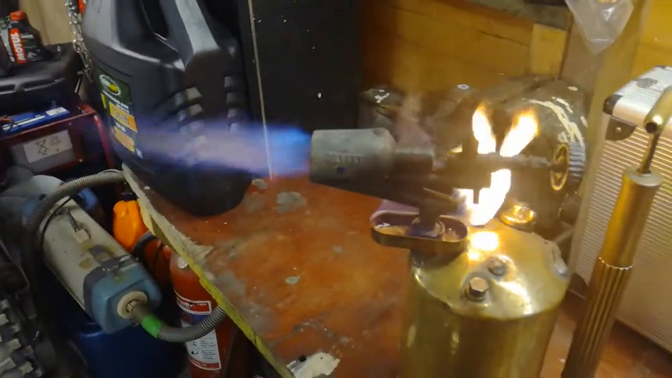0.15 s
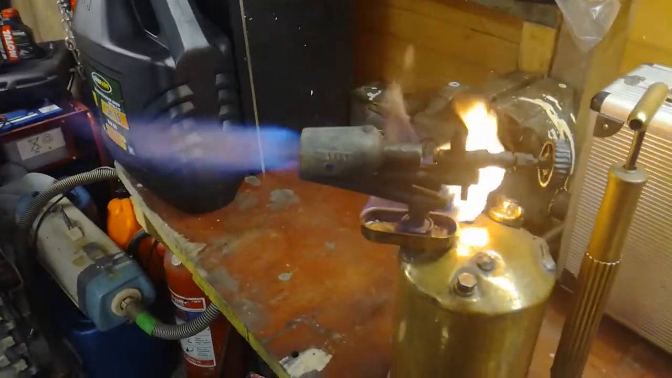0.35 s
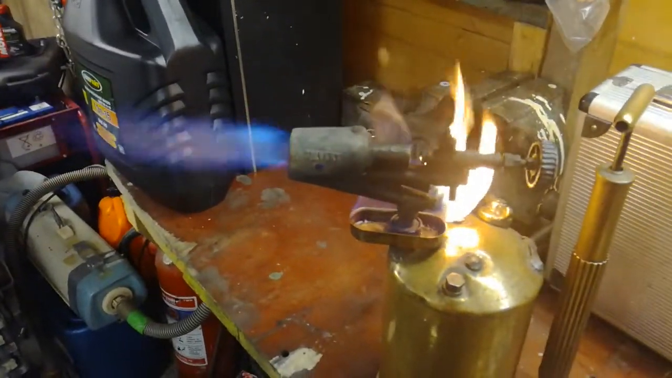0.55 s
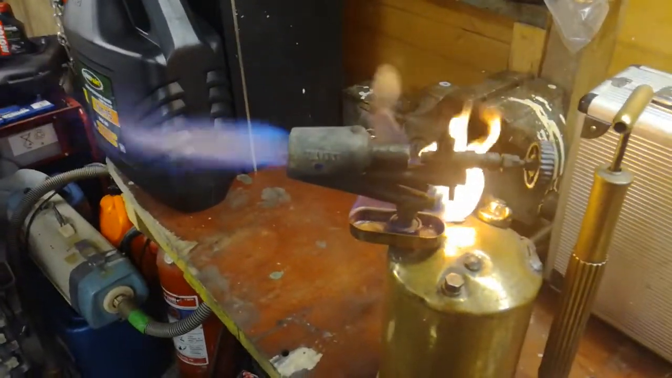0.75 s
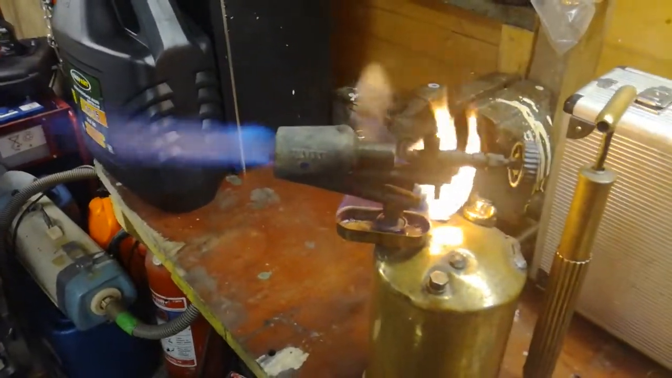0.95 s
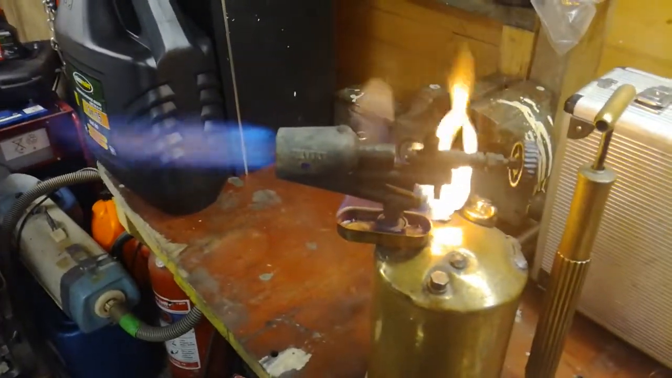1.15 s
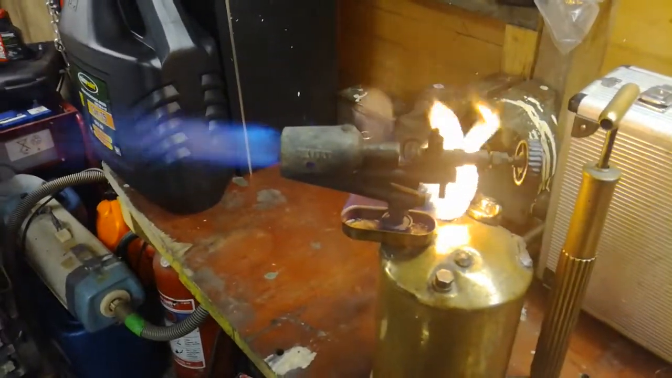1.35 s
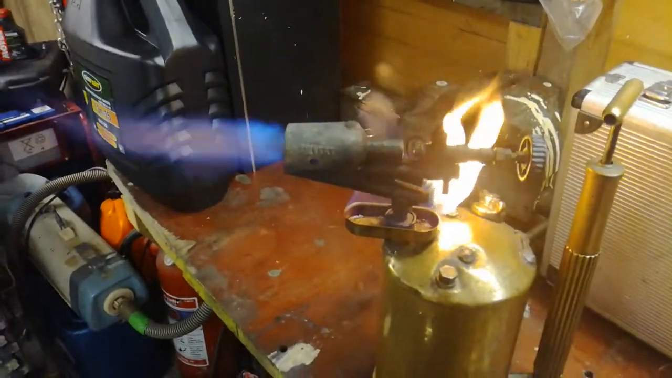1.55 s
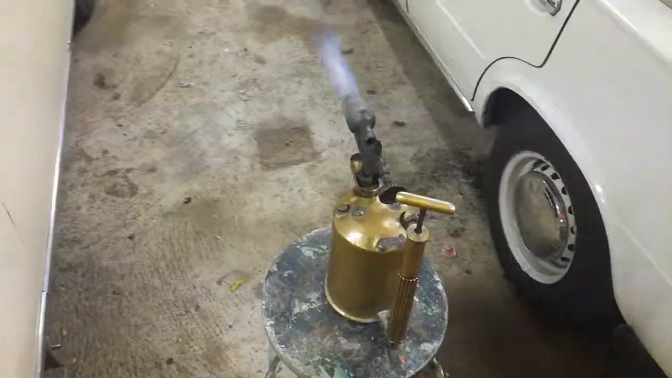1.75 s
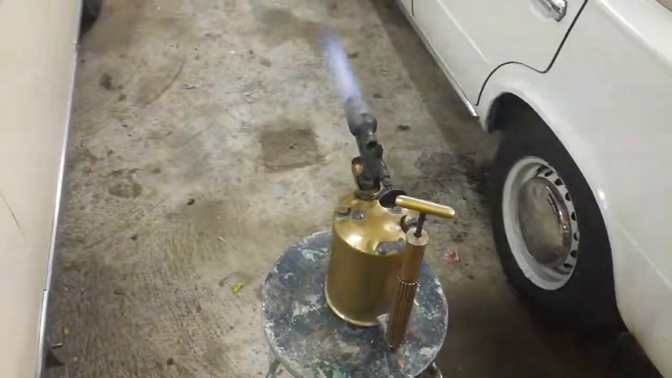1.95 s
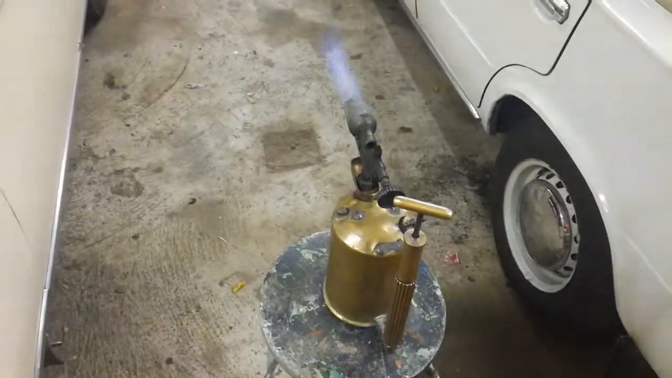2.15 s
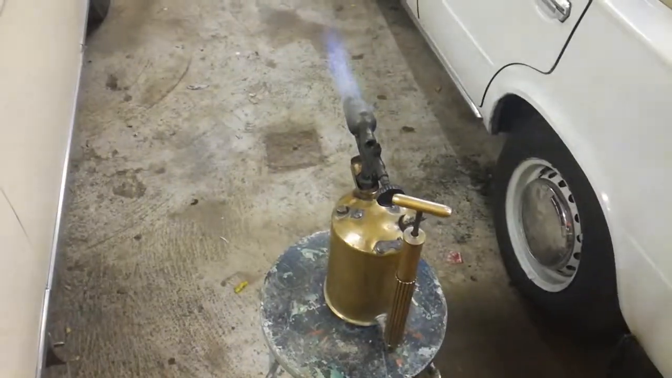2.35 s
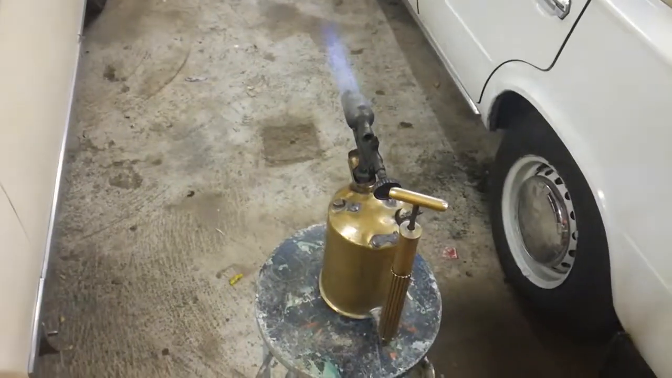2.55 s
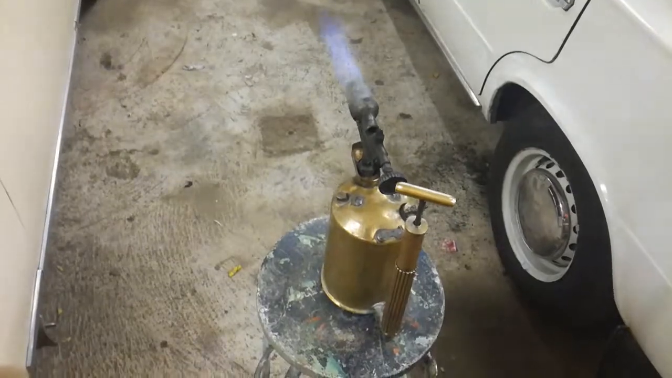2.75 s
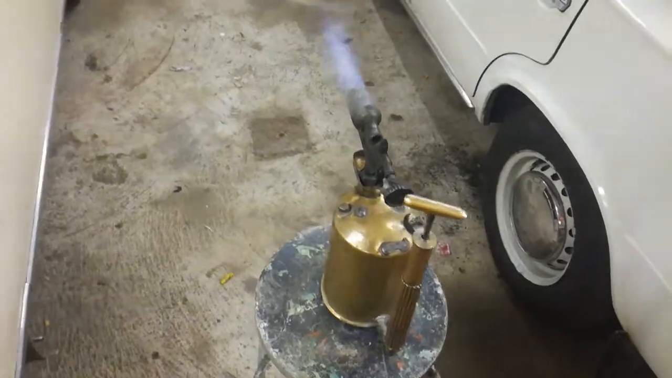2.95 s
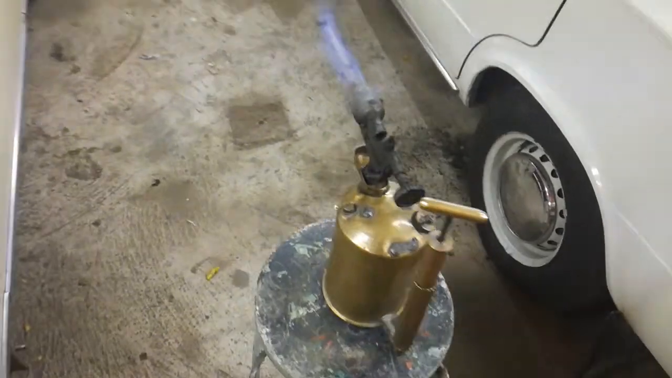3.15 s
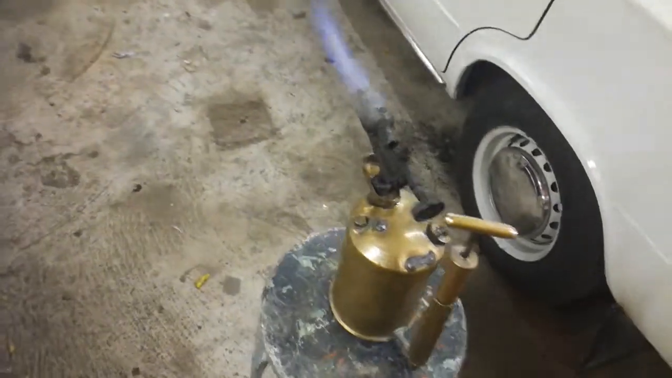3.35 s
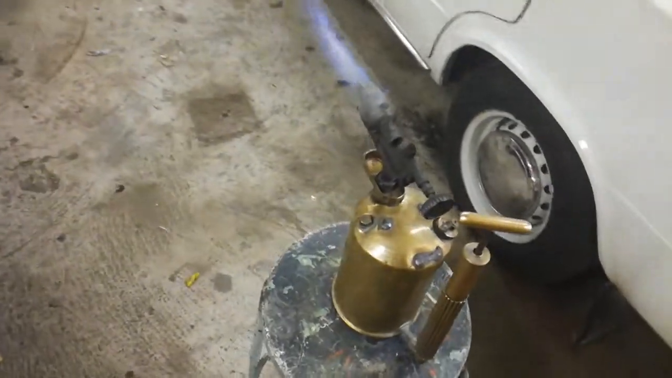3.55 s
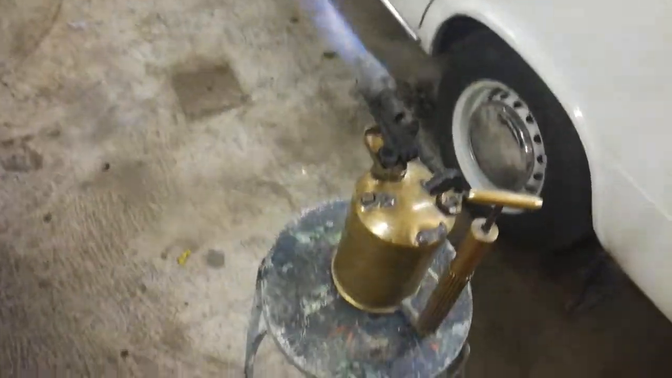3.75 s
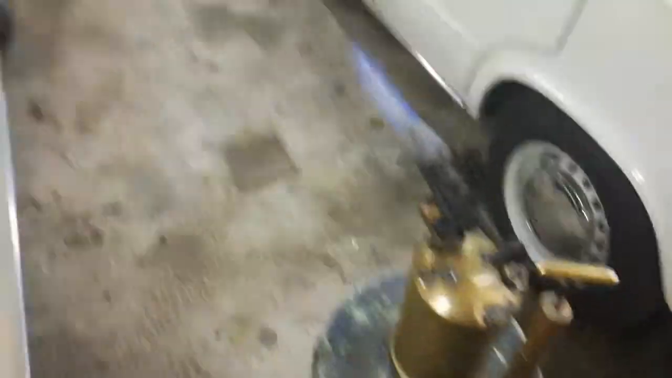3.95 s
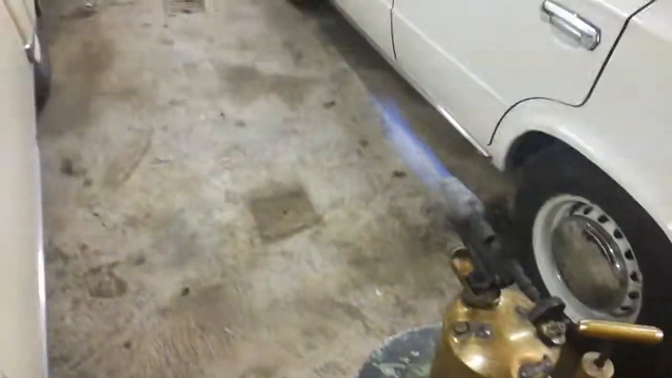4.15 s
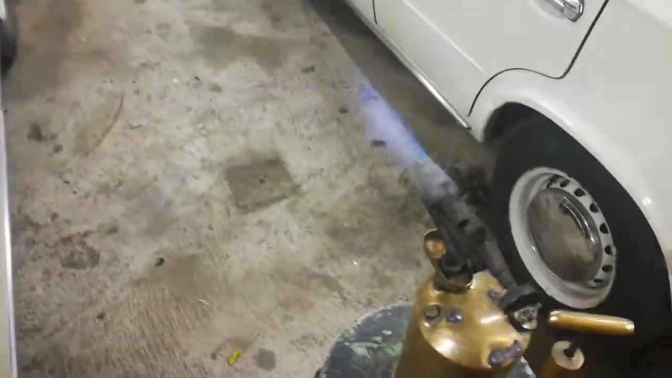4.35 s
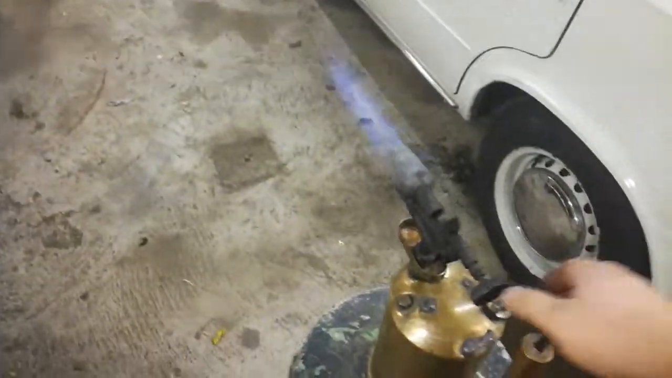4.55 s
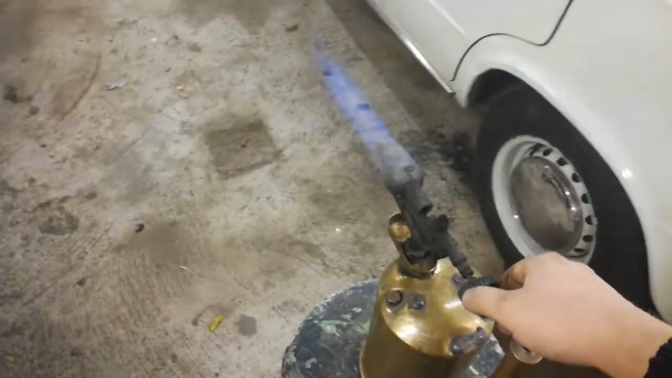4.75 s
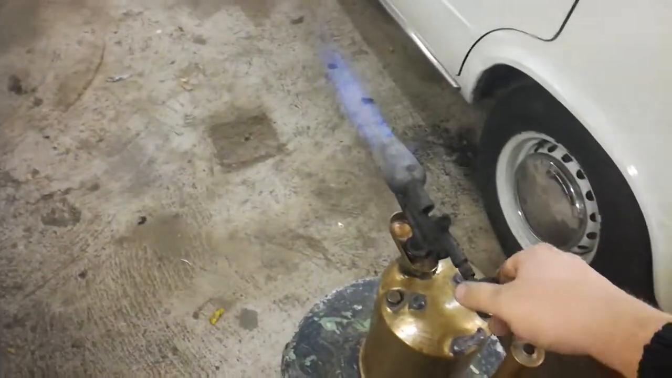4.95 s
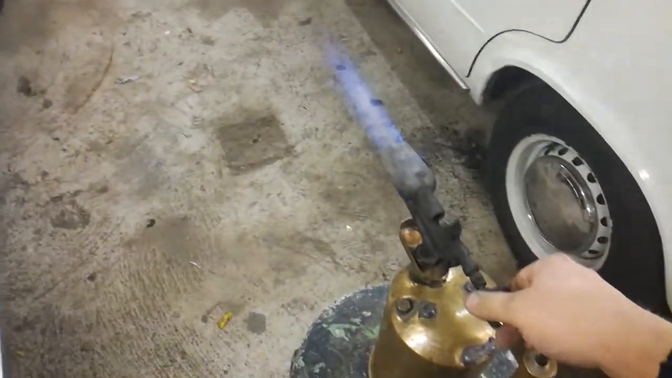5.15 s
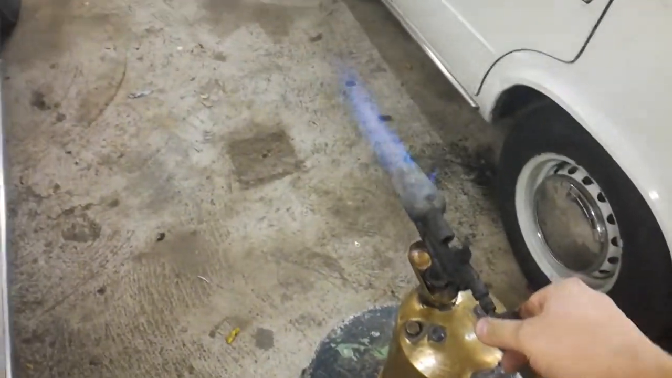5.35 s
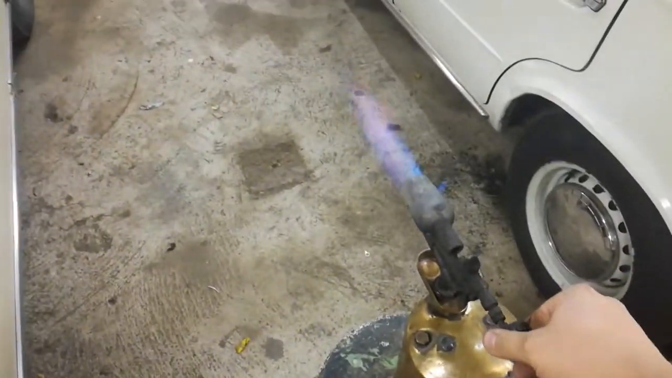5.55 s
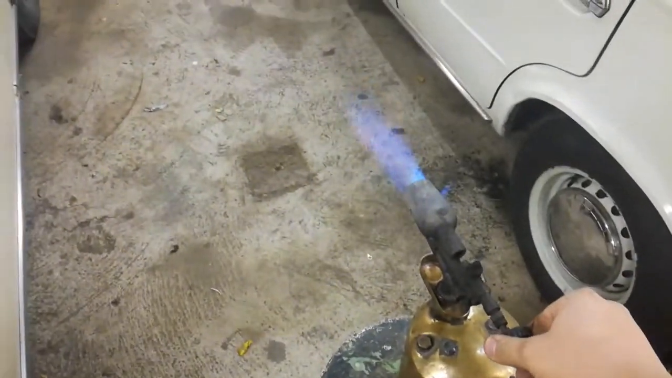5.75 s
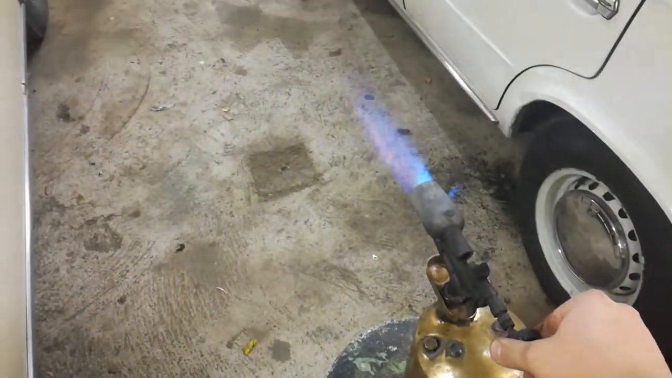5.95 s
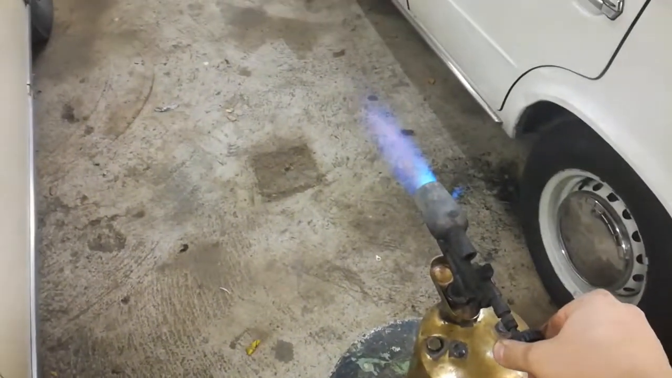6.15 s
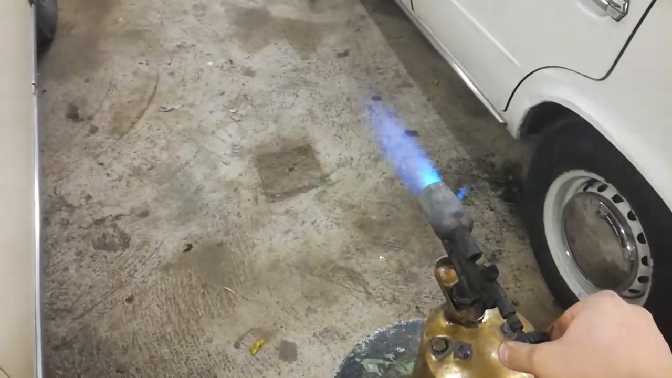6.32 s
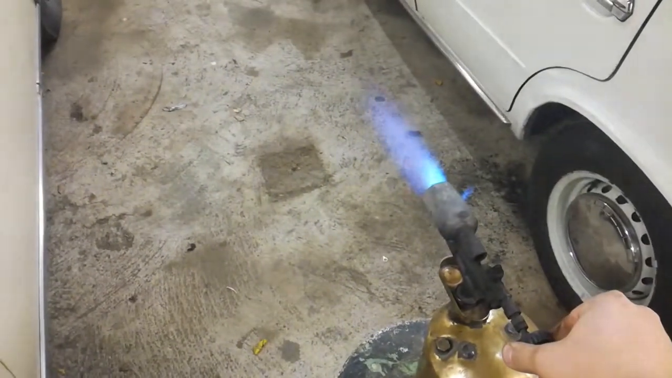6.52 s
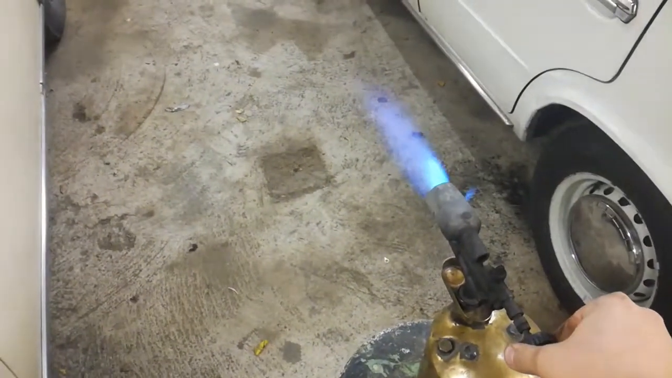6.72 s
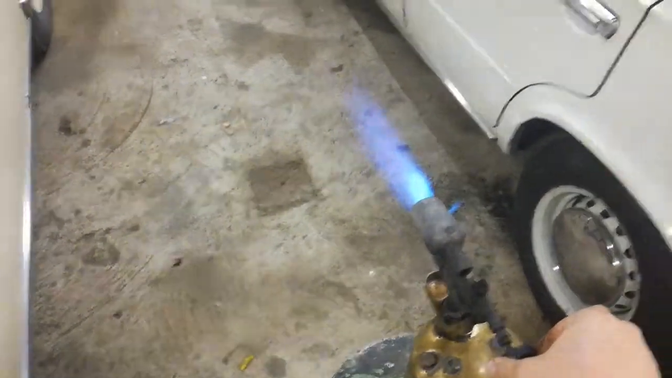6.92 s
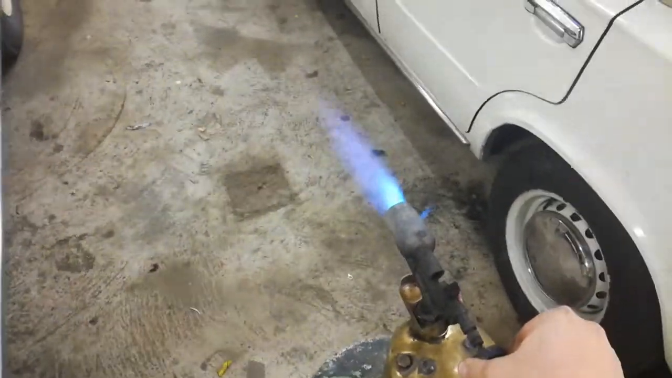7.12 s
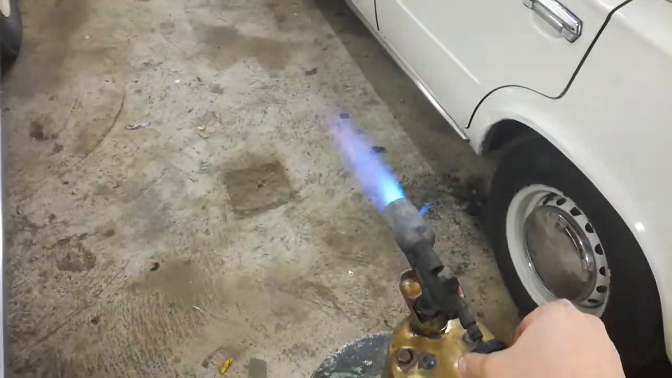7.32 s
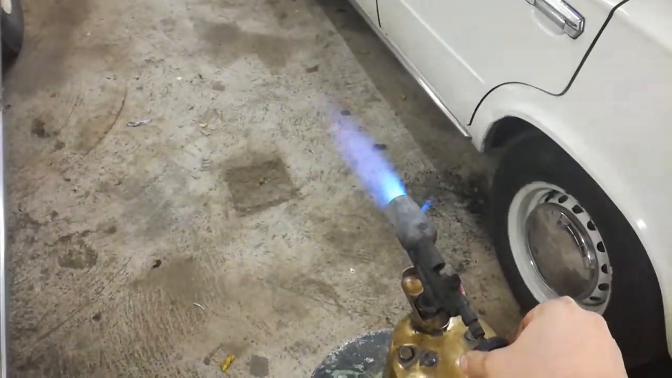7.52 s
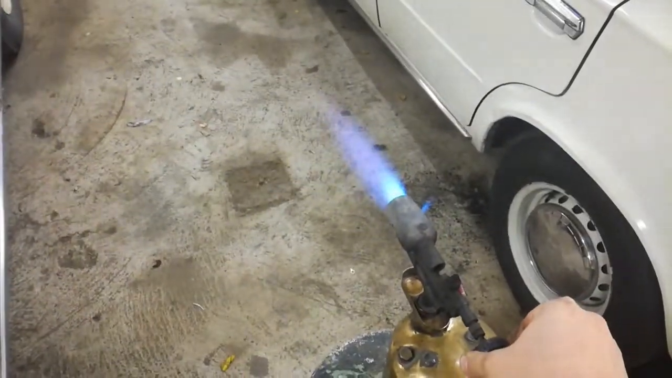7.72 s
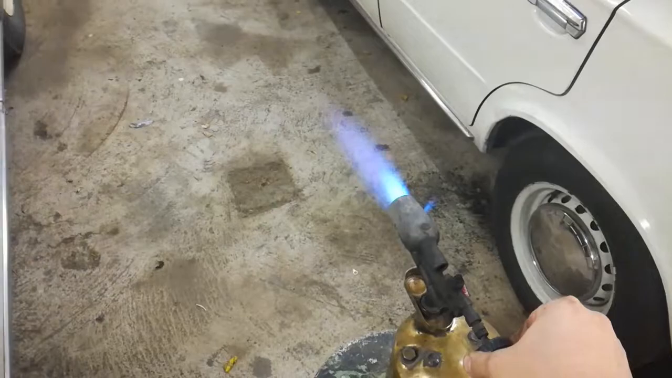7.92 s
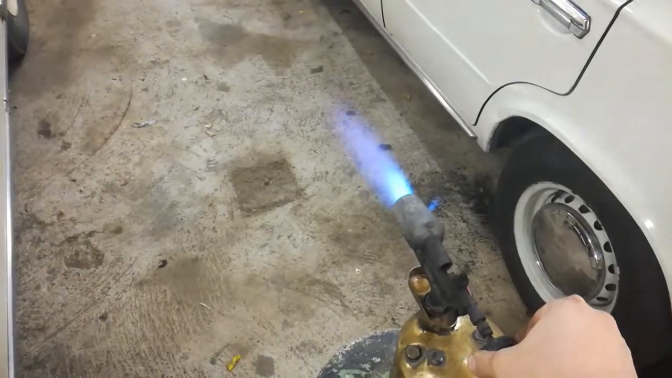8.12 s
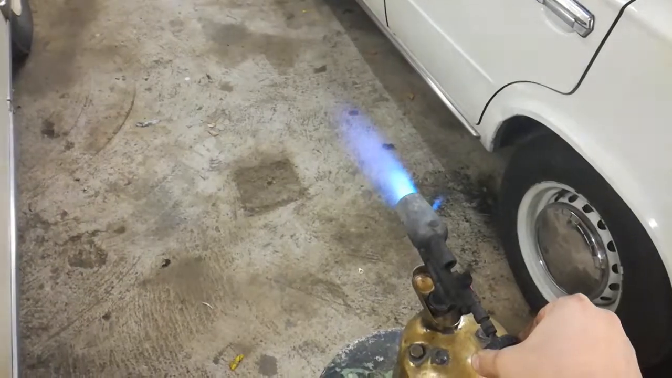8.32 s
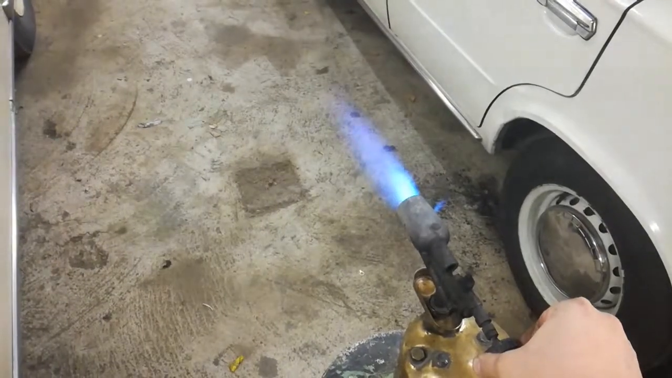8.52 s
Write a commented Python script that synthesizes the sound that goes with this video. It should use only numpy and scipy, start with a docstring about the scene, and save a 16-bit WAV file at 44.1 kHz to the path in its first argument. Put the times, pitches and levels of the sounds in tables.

```python
"""In a garage a pressurised gasoline blowtorch burns, first close up on a cluttered bench, its flame throbbing,
then, after a short gap, on a stool beside a car. The listener steps nearer and the valve is opened to a full roar.
Turbulent noise, shaped by resonances and echoes, is split into the roar of the flame, the rush of the burner tube
and the hiss of the vapour jet; narrow bands of noise add whistles, tube notes, humps of hiss and low booms."""
import sys
import numpy as np
from scipy import signal
from scipy.fft import rfft, irfft
from scipy.io import wavfile

SR = 44100
rng = np.random.default_rng(int(sys.argv[2]) if len(sys.argv) > 2 else 0)


def wrap_up_sound(samples):
    """Save the sound to the file named by the first command line argument, as 16-bit audio."""
    columns = np.atleast_2d(samples).T
    # keep every value between -1 and 1, then stretch to whole-number steps
    tamed = np.clip(columns, -1, 1)
    steps = np.round(tamed * 32767).astype(np.int16)
    wavfile.write(sys.argv[1], SR, steps)


N = 378378
BINS = np.arange(N // 2 + 1) * SR / N   # frequencies of the spectrum, Hz
ROAR_TOP_HZ, RUSH_TOP_HZ = 400, 4000    # borders between roar, rush and hiss

# when the torch on the bench is heard: time_s, gain (0-1)
BENCH_AUDIBLE = [(0, 1), (1.484, 1), (1.486, .06), (1.5, .008), (1.517, 0), (1.591, 0), (1.5915, 1),
                 (1.615, .65), (1.622, 0)]
# when the torch on the stool is heard: time_s, gain (0-1)
STOOL_AUDIBLE = [(1.61, 0), (1.625, 1)]


def torch_on_bench():
    """Amplitude modulation: close by, the low surges of the flame make its rush and hiss throb."""
    # broad spectrum of the flame: pitch_hz, relative_db
    colour = [(15, -54), (30, -31), (45, -20), (62, -1.5), (110, -3), (220, 0), (450, -17), (1400, -11.5),
              (3000, -17.5), (4200, -24.5), (6200, -22.5), (7500, -28), (11000, -21), (12500, -28.5),
              (15700, -31.5)]
    # resonances of tube and surroundings, and dips where echoes cancel: pitch_hz, width_hz, left_db, right_db
    modes = [(162.6, 91, -14.5, -13.5), (340.0, 41, -11.5, -9.5), (566, 100, -4.5, -3),
             (664.0, 49.0, 5.5, -3), (716, 68.0, 1.5, 5.5), (833, 100, -12.5, -9), (939.0, 83, 7.5, 8),
             (1162, 66.0, -13, -9), (1293, 67, 4, 5), (1420, 86, -10.5, -10), (1980, 320, -12.5, -2.5),
             (2520, 980, 13, -2.5), (2605, 230, -8, 14), (3480, 1050, -13.5, -10), (5920, 380, 3.5, 6),
             (7361.0, 669.0, -2, 1), (9500, 1450, -6.0, 9.5), (9770.0, 4100, -2.5, -12.5),
             (12837.0, 1500, -4, -2.5), (15450.0, 660, 0, 3)]
    # arrival at the two microphones: pitch_hz, left_right_db, direct_share (0-1), left_lead_rad
    ports = [(120.0, -0.1, 0.98, 0.2), (330.0, 0.0, 0.88, 0.7), (480.0, 3.1, 0.81, 1.7),
             (620.0, 8.3, 0.6, 1.7), (730.0, 4.6, 0.53, 0.7), (900.0, 2.8, 0.59, 0.1),
             (1080.0, 0.6, 0.7, 0.4), (1300.0, 1.8, 0.75, 1.2), (1500.0, -0.2, 0.71, 0.6),
             (1750.0, -3.1, 0.6, 0.9), (2100.0, 2.5, 0.39, 2.2), (2500.0, 5.4, 0.27, 1.5),
             (2900.0, 5.7, 0.15, 1.2), (3400.0, 1.4, 0.15, 0.8), (3800.0, 1.6, 0.15, 3.1),
             (4600.0, 2.2, 0.31, 4.8), (5200.0, -0.7, 0.38, 4.7), (6200.0, -5.3, 0.39, 4.1),
             (8000.0, -5.0, 0.17, 5.5), (9500.0, -6.0, 0.06, 4.7), (11500.0, -4.6, 0.14, 4.6),
             (15000.0, -8.5, 0.12, 6.2)]
    # sinking hiss of the jet, ahead of its overall level: time_s, relative_db
    hiss_curve = [(.85, -25), (1.1, -29.5), (1.47, -28)]
    parts = burner(colour, modes, ports)
    steady_db = np.zeros(N)
    sound = flame(parts, [steady_db, steady_db, in_time(hiss_curve)[0]], throb_top_hz=110, throb_db=0.87,
                  steepness=0.21, flutter_db=1.0, waver_db=0.74, hiss_share=0.94,
                  roar_db=-27.0, rush_db=-27.0, hiss_db=-5.5)
    return sound * in_time(BENCH_AUDIBLE)


def torch_on_stool():
    """Source strength follows fuel flow: a smoother flame, far and then near, grows as the valve opens."""
    # the step towards the torch: time_s, nearness (0-1)
    approach = [(3.75, 0), (4.25, 1)]
    # the fuel valve: time_s, opening (0-1)
    valve = [(5.52, 0.02), (5.63, 0.8), (6.3, 0.99)]
    # the listener's passage through the beam of the jet: time_s, facing (0-1)
    beam = [(2.65, 0), (3.1, 0.3), (3.8, 0.94), (3.98, 0.3)]
    # strength of the fuel flow, of which only the excess over idle counts: time_s, level_db
    fuel_flow = [(1.7, -33), (2.9, -32), (3.15, -32), (3.8, -32.5), (4.15, -33), (4.7, -33), (5.5, -33),
                 (5.63, -29.5), (5.8, -29), (5.94, -25.5), (6.2, -24), (6.8, -22), (7.05, -20.5),
                 (7.4, -18), (7.72, -18), (8.0, -19.5), (8.5, -19)]
    idle_db = -33
    roar_follows, hiss_follows = 0.73, 0.98   # dB for each dB of flow above idle
    near_roar_db, near_hiss_db = 2.5, -3.5    # from near, the listener stands behind the jet
    facing_hiss_db, open_hiss_db = 1, 1       # more hiss in the beam and with the valve open
    tube_beam_db = 2                          # tube notes are stronger in the beam

    nearness, opening, facing = (np.clip(in_time(curve)[0], 0, 1) for curve in (approach, valve, beam))
    flow_db = in_time(fuel_flow)[0] - idle_db
    flow = from_db(flow_db)   # 1 at idle
    roar_db = roar_follows * flow_db + near_roar_db * nearness
    hiss_db = hiss_follows * flow_db + near_hiss_db * nearness
    hiss_db = hiss_db + facing_hiss_db * facing + open_hiss_db * opening
    parts = burner_on_stool(nearness, opening)
    sound = flame(parts, [roar_db, flow_db, hiss_db], throb_top_hz=200, throb_db=-0.2,
                  steepness=0.017, flutter_db=0.5, waver_db=0.57, hiss_share=0.88,
                  roar_db=-35.0, rush_db=-34.0, hiss_db=-41.5)
    tube = np.maximum(nearness, from_db(tube_beam_db) * facing) * tube_notes()
    tones = flow * (tube + nearness * jet_humps(flow))
    return (sound + floor_echo(sound) + tones) * in_time(STOOL_AUDIBLE)


def flame(parts, levels_db, throb_top_hz, throb_db, steepness, flutter_db, waver_db, hiss_share,
          roar_db, rush_db, hiss_db):
    """Amplitude modulation: low pressure surges of the flame modulate the rush, and the hiss a little less."""
    roar, rush, hiss = parts * from_db(levels_db)[:, None]
    surge = rms_one(filtered(roar.mean(axis=0), throb_top_hz, "low"))
    roar = roar + steepness * filtered(roar * surge, throb_top_hz, "high")   # sharp crests, shallow troughs
    unrest_db = throb_db * surge + flutter_db * drift(55) + waver_db * drift(6.6)
    rush = rush * rms_one(from_db(unrest_db))
    hiss = hiss * rms_one(from_db(hiss_share * unrest_db))
    return from_db(roar_db) * roar + from_db(rush_db) * rush + from_db(hiss_db) * hiss


def burner(colour, modes, ports):
    """Resonance: turbulence takes on peaks and dips, then splits into stereo roar, rush and hiss of like power."""
    shape_db = in_hz(colour)[0]
    for hz, width, left_db, right_db in modes:
        resonance = 1 / (1 + (2 * (BINS - hz) / width) ** 2)
        shape_db = shape_db + np.array([[left_db], [right_db]]) * resonance
    no_deepest_bass = 1 - 1 / (1 + (BINS / 22) ** 4)
    sound = turbulence_at(ports) * from_db(shape_db) * no_deepest_bass
    above_roar, above_rush = (1 - 1 / (1 + (BINS / edge) ** 8) for edge in (ROAR_TOP_HZ, RUSH_TOP_HZ))
    shares = (1 - above_roar, above_roar - above_rush, above_rush)
    parts = [irfft(sound * share, N) for share in shares]
    return np.array([part / np.std(part.mean(axis=0)) for part in parts])   # unit rms in the middle


def burner_on_stool(nearness, opening):
    """Power addition of unrelated noises: the burner from afar passes to near, then to wide open."""
    # broad spectra from afar, from near and fully open: pitch_hz, relative_db
    far_colour = [(30.0, -20.8), (60.0, -11.4), (110.0, -3.1), (220.0, -0.5), (450.0, -17.5), (1400.0, -8),
                  (3000.0, -8.5), (4200.0, -15), (6200.0, -16.1), (7500.0, -21.5), (11000.0, -31),
                  (12500.0, -37.1), (15700.0, -31)]
    near_colour = [(30.0, -25), (60.0, -10.5), (110.0, -9.5), (220.0, -0.5), (450.0, -14.5), (1400.0, -12),
                   (3000.0, -14), (4200.0, -25), (6200.0, -23.2), (7500.0, -32), (11000.0, -33.1),
                   (12500.0, -38.5), (15700.0, -33.5)]
    open_colour = [(30.0, -37), (60.0, -14.5), (110.0, -9), (220.0, -0.5), (450.0, -4.5), (1400.0, -13.5),
                   (3000.0, -18.5), (4200.0, -23.5), (6200.0, -27), (7500.0, -28.5), (11000.0, -31),
                   (12500.0, -34), (15700.0, -37)]
    # resonances of tube and surroundings, and echo dips: pitch_hz, width_hz, left_db, right_db
    far_modes = [(130, 48, -10, -10.5), (310, 18, -3, -4), (394, 20.0, 3, 5.0), (554, 170, 6, 6),
                 (687.0, 41.0, -3, 6.5), (732.0, 47, 4.0, 0), (828.0, 78.0, 4.5, -8),
                 (904.0, 51.0, -4, 0.5), (1010, 65, 2.0, 5.5), (1250, 42, -5, -7.5),
                 (1388.0, 87, -7.5, -8.5), (1615, 39, -1.0, 3.5), (1870, 369.0, -4, -6.5),
                 (2270, 231.0, -3, 3), (2550, 72, 3.5, 0.5), (3110, 110, 6.5, 0), (3370, 69, 8, 2),
                 (3380, 308.0, -5, -3), (4730, 1140, -9.0, -9), (6500, 591.0, -6, -4.0),
                 (7900, 255.0, -1, -2), (11100, 1300, 0.5, 6), (13049.0, 1244.0, 5, -0.5),
                 (15550.0, 744.0, -11.0, -3.0)]
    near_modes = [(285.0, 23, -2, -6.5), (324, 36.0, 3.5, 0.5), (399.0, 33, 2, 6.5), (613, 70.0, 8.5, -11),
                  (656.0, 230, -4, 8.5), (721.0, 76.0, 1, -11), (836, 63.0, -6, -4), (1087.0, 72, -4, -9),
                  (1244.0, 95.0, -4, -4), (1610, 94.0, -13, -4.5), (1676.0, 109.0, 5.5, -2),
                  (1850, 89.0, -9, -5), (1940.0, 93.0, 1.5, -7), (2220, 269.0, -5.5, -1),
                  (2580, 100, -9, -5), (3130, 150, -7, 0), (3160, 1300, 6, 3.0), (5947.0, 933.0, 1.5, 0.5),
                  (7058.0, 2000, -1.5, -1.5), (15600, 1155.0, -10.5, -6)]
    open_modes = [(277, 16, -4.5, -6), (328, 28.0, 5.5, -2.0), (436, 16, -6.5, -4.5), (593, 45, 12, -14),
                  (641, 41, 6, 12), (680, 320, -12, -3), (745, 69, 12, 1.5), (934, 33, 7, 5.5),
                  (1030, 29.0, -8, 4.5), (1070, 60.0, 2.5, -10), (1180, 32, 2.5, -1), (1520, 160, 5, 5.5),
                  (1616.0, 106, -7, -1), (1750, 140, 5, -4.5), (2170, 160, 4, 6.5), (2504.0, 49, 11.5, 7),
                  (2876, 310, 7.5, 10.5), (3069.0, 260, 4.5, -0.5), (3274.0, 142.0, -2.5, -3),
                  (3455, 200, 7.0, 9.5), (4010.0, 152.0, 1.5, -7), (5000, 1030, 9, 10.5),
                  (5620, 212.0, 5.5, -2.5), (8800, 2770.0, 3.5, 4.5)]
    # arrival at the two microphones: pitch_hz, left_right_db, direct_share (0-1), left_lead_rad
    far_ports = [(120.0, -0.0, 0.99, -0.0), (330.0, 0.1, 0.85, 0.1), (480.0, 1.8, 0.56, 1.1),
                 (620.0, 4.1, 0.66, 1.3), (730.0, 6.5, 0.16, -0.3), (900.0, 2.7, 0.42, -0.5),
                 (1080.0, -0.1, 0.74, 0.1), (1300.0, -1.7, 0.58, 0.4), (1500.0, -2.0, 0.59, -0.2),
                 (1750.0, -2.3, 0.39, 0.1), (2100.0, -6.2, 0.16, -0.8), (2500.0, -3.3, 0.2, 1.4),
                 (2900.0, 2.1, 0.23, 1.3), (3400.0, 1.6, 0.16, 0.6), (3800.0, -1.0, 0.26, 2.7),
                 (4600.0, -1.2, 0.09, 3.8), (5200.0, -3.3, 0.19, 6.6), (6200.0, -7.1, 0.03, 5.8),
                 (8000.0, -8.8, 0.07, 4.8), (9500.0, -8.6, 0.1, 5.7), (11500.0, -7.3, 0.09, 6.7),
                 (15000.0, -7.4, 0.04, 6.2)]
    near_ports = [(120.0, 0.0, 0.99, -0.1), (330.0, -0.2, 0.83, -0.4), (480.0, -1.9, 0.41, 0.2),
                  (620.0, 2.7, 0.21, 1.1), (730.0, 3.1, 0.4, 0.0), (900.0, -0.2, 0.39, 0.7),
                  (1080.0, 3.9, 0.34, -0.0), (1300.0, 2.2, 0.68, -0.5), (1500.0, 1.1, 0.73, -0.1),
                  (1750.0, 3.8, 0.36, 0.4), (2100.0, 3.5, 0.4, 0.0), (2500.0, 3.6, 0.26, 0.0),
                  (2900.0, 4.2, 0.39, -0.3), (3400.0, 5.8, 0.52, -0.1), (3800.0, 7.3, 0.19, -0.3),
                  (4600.0, 5.0, 0.23, -2.4), (5200.0, 2.4, 0.36, -3.0), (6200.0, -0.1, 0.32, -3.3),
                  (8000.0, -2.5, 0.24, -3.5), (9500.0, -6.2, 0.12, -4.1), (11500.0, -8.3, 0.07, -4.5),
                  (15000.0, -8.3, 0.04, -5.2)]
    open_ports = [(120.0, 0.1, 0.98, -0.1), (330.0, -0.2, 0.83, -0.4), (480.0, -2.7, 0.51, -0.0),
                  (620.0, 2.2, 0.09, 1.9), (730.0, 2.2, 0.47, -0.0), (900.0, -1.5, 0.27, 0.7),
                  (1080.0, 3.7, 0.22, -0.1), (1300.0, 2.5, 0.7, -0.6), (1500.0, 0.9, 0.78, -0.1),
                  (1750.0, 5.5, 0.3, -0.4), (2100.0, 3.8, 0.33, -0.3), (2500.0, 4.4, 0.29, -1.1),
                  (2900.0, 2.5, 0.28, -0.9), (3400.0, 3.8, 0.48, -0.5), (3800.0, 6.9, 0.17, -0.8),
                  (4600.0, 4.5, 0.45, -2.8), (5200.0, 1.6, 0.52, -3.1), (6200.0, -1.0, 0.3, -3.5),
                  (8000.0, -3.8, 0.12, -3.9), (9500.0, -7.0, 0.13, -5.4), (11500.0, -8.0, 0.07, -6.6),
                  (15000.0, -8.1, 0.02, -8.0)]
    far = burner(far_colour, far_modes, far_ports)
    near = burner(near_colour, near_modes, near_ports)
    wide_open = burner(open_colour, open_modes, open_ports)
    return blend(blend(far, near, nearness), wide_open, opening)


def tube_notes():
    """Tube resonance: narrow bands of noise at the burner tube's own notes."""
    # notes of the burner tube: pitch_hz, width_hz, level_db (at idle), left_right_db
    notes = [(484.4, 26, -53, -3), (733, 22.6, -48.5, 6), (1454, 50, -52, -2), (2850, 58, -47.5, -3),
             (2968, 53, -48.5, 1)]
    return sum(from_db(level_db) * noise_band(hz, width, balance_db)
               for hz, width, level_db, balance_db in notes)


def jet_humps(flow):
    """Jet noise: humps in the hiss glide up with the pressure, which goes as the square of the flow."""
    # humps in the hiss: pitch_hz (at no pressure), width_hz, level_db (at idle), left_right_db
    humps = [(8320, 970, -50, -5), (9520, 700, -52.5, -9)]
    rise = 0.0046   # share of the pitch for each multiple of the idle pressure
    out = np.zeros((2, N))
    for hz, width, level_db, balance_db in humps:
        phase = 2 * np.pi * np.cumsum(hz * (1 + rise * flow ** 2)) / SR
        # two slow noises on a carrier in quadrature make a gliding band
        a, b = filtered(rng.standard_normal((2, 2, N)), width / 2, "low")
        hump = rms_one(a * np.cos(phase) + b * np.sin(phase))
        out += from_db(level_db) * panned(balance_db) * hump
    return out


def puff():
    """Impulsive combustion: the first extra fuel catches with one soft thump, a few cycles long."""
    at_s, rise_s, pitch_hz, peak_db = 5.578, 0.011, 194, -20
    age = np.maximum(np.arange(N) / SR - at_s, 0)
    rise = age / rise_s
    envelope = rise ** 2 * np.exp(2 * (1 - rise))   # reaches 1 after rise_s
    return from_db(peak_db) * envelope * np.sin(2 * np.pi * pitch_hz * age)


def booms():
    """Combustion resonance: the flame locks into a low boom for a while, made as a narrow band of noise."""
    # booms of the flame: start_s, end_s, pitch_hz, width_hz, level_db, left_right_db
    boom_rows = [(.02, 1.12, 66.7, 13.5, -28.5, -1.5), (5.54, 6.2, 65.4, 38, -38.5, -1),
                 (3.3, 4.0, 166, 75, -40.5, -2), (5.67, 6.02, 160, 29, -32, -3),
                 (6.3, 6.9, 212, 29, -24, -1.5), (6.62, 7.4, 97.8, 24, -33, 0)]
    return swells(boom_rows, swell_share=0.15)


def whistles():
    """Narrow-band jet noise: on the bench the jet's breathy whistle hops from pitch to pitch."""
    # whistles of the jet: start_s, end_s, pitch_hz, width_hz, level_db, left_right_db
    whistle_rows = [(-.2, .85, 6020, 400, -35, -8), (-.2, .6, 13000, 1690, -44.5, -9),
                    (.88, 1.1, 11500, 900, -41, -7), (.6, .68, 11700, 1400, -36, -9),
                    (.79, .86, 10000, 1200, -31.5, -7), (.82, .9, 11100, 1000, -35, -7),
                    (.85, 1.6, 8050, 1000, -35.5, -5)]
    return swells(whistle_rows, swell_share=0.21)


def passing_bands():
    """Spectral emphasis: bands of noise stand out for a while, some as the listener moves, others as the valve opens."""
    # passing bands: start_s, end_s, pitch_hz, width_hz, level_db, left_right_db
    band_rows = [(.95, 1.6, 1800, 700, -37.5, -19), (.97, 1.6, 3350, 906, -47, -16),
                 (1.6, 2.9, 3330, 130, -49.5, -16), (2.92, 3.42, 2400, 227, -41, -18),
                 (2.85, 3.35, 3140, 100, -46, 6), (3.0, 3.35, 3330, 110, -46, 0),
                 (3.42, 4.05, 2300, 400, -41.5, -20), (3.42, 4.1, 2910, 300, -41.5, -17),
                 (3.25, 3.88, 5800, 400, -44, -7), (3.4, 3.88, 7250, 450, -53, -10),
                 (3.15, 3.42, 8200, 400, -53, -10), (3.9, 4.4, 5720, 450, -46, 13),
                 (4.45, 5.2, 5900, 600, -52.5, 0), (4.62, 5.1, 3550, 270, -45.5, 5),
                 (4.75, 5.5, 2880, 110, -43, 2), (3.2, 4.0, 735, 34, -48.5, 2),
                 (5.5, 6.5, 3400, 200, -41.5, 5), (5.65, 7.0, 13400, 800, -49, -8),
                 (5.55, 6.0, 9000, 1800, -44.5, -6), (6.9, 8.7, 244, 36, -26.5, -2.5)]
    return swells(band_rows, swell_share=0.2)


def floor_echo(sound):
    """Comb filtering: the treble bounces off the concrete floor; as the lag shrinks, the comb glides upwards."""
    # the bounce while the listener moves: time_s, lag_s, gain
    bounce = [(2.7, .0015, 0), (3.1, .00135, .22), (3.9, .00122, .28), (4.5, .00085, .3), (5.0, .0007, 0)]
    lag_s, gain = in_time(bounce)
    t = np.arange(N) / SR
    treble = filtered(sound, 2500, "high")
    return gain * np.array([np.interp(t - lag_s, t, side) for side in treble])


def turbulence_at(ports):
    """Partial coherence: white turbulence reaches two microphones directly and by the garage's dying echoes."""
    alike_hz = 227         # long waves, below this, reach both microphones alike
    stirred_share = 0.08   # share scrambled by hot, moving air where no sound is direct
    balance_db, direct, lead = in_hz(ports)
    apart = 1 - 1 / (1 + (BINS / alike_hz) ** 4)
    direct = np.clip(1 - apart * (1 - direct), 0, 1)
    straight = np.exp(.5j * apart * lead * np.array([[1], [-1]]))
    left, right = blend(rfft(garage_echoes(), N), straight, direct)
    # the sum and the difference get the power that the coherence calls for
    alike = direct * np.cos(apart * lead)
    mid, side = evened(left + right, 1 + alike), evened(left - right, 1 - alike)
    response = evened(np.array([mid + side, mid - side]), 0.95)
    heard = rfft(rng.standard_normal(N)) * response
    stirred = rfft(rng.standard_normal((2, N)))
    return panned(apart * balance_db) * blend(heard, stirred, stirred_share * (1 - direct))


def garage_echoes():
    """Reverberant decay: noise dies exponentially, first bounces from floor and nearby things the faster."""
    garage_t60_s, early_t60_s = 0.36, 0.064
    early_db = 10   # first bounces above the garage's tail, at the start
    fall = -np.log(1000) * np.arange(SR) / SR
    decay = np.exp(fall / garage_t60_s) + from_db(early_db) * np.exp(fall / early_t60_s)
    tail = rng.standard_normal((2, SR)) * decay
    return tail / np.sqrt(np.sum(tail ** 2, axis=1, keepdims=True))


def evened(response, power):
    """Interference ripple: keep that of the echoes, but even out power over a span that widens with pitch."""
    span_hz, widens_hz = 50, 1400   # span at the bottom, and the pitch where it has doubled
    reach = span_hz * (1 + (BINS / widens_hz) ** 2) / 2
    low, high = (np.clip(edge * N / SR, 0, len(BINS) - 1).astype(int) for edge in (BINS - reach, BINS + reach))
    total = np.cumsum(np.abs(response) ** 2, axis=-1)
    return response * np.sqrt(power * (high - low) / (total[..., high] - total[..., low] + 1e-9))


def swells(rows, swell_share):
    """Envelope shaping: bands of noise swell, hold and fade; the longer they last, the slower they swell."""
    t, out = np.arange(N) / SR, np.zeros((2, N))
    for start, end, hz, width, level_db, balance_db in rows:
        from_edge_s = np.minimum(t - start, end - t)
        held = np.clip(.5 + from_edge_s / (swell_share * abs(end - start)), 0, 1)
        on = np.flatnonzero(held)
        if len(on):
            out[:, on] += from_db(level_db) * held[on] * noise_band(hz, width, balance_db, size=len(on))
    return out


def noise_band(hz, width, balance_db, size=N):
    """Decorrelation: a narrow stereo band of noise; the higher it lies, the less alike are left and right."""
    edges = [hz - width / 2, hz + width / 2]
    run_in = SR // 2
    band = rms_one(filtered(rng.standard_normal((2, size + run_in)), edges, "band")[:, -size:])
    return panned(balance_db) * blend(band[0], band, hz / RUSH_TOP_HZ)


def drift(rate_hz):
    """Low-passed noise: slow chance of unit rms, run in for a second."""
    return rms_one(filtered(rng.standard_normal(N + SR), rate_hz, "low")[SR:])


def blend(a, b, share):
    """Power addition: pass from one unrelated noise to another at constant power."""
    share = np.clip(share, 0, 1)
    return np.sqrt(1 - share) * a + np.sqrt(share) * b


def panned(balance_db):
    """Intensity stereo: left and right gains of constant power."""
    pair = from_db([balance_db / 2, -balance_db / 2]).reshape(2, -1)
    return pair / np.sqrt(np.mean(pair ** 2, axis=0))


def filtered(x, hz, kind):
    """Second-order Butterworth design: a gentle low-, high- or band-pass."""
    return signal.sosfilt(signal.butter(2, hz, kind, fs=SR, output="sos"), x)


def from_db(db):
    """Logarithmic level: decibels to amplitude gain."""
    return 10 ** (np.asarray(db) / 20)


def rms_one(x):
    """Normalisation: scale to unit rms."""
    return x / np.sqrt(np.mean(x ** 2) + 1e-20)


def in_time(rows):
    """Linear interpolation: each column of a curve at every sample."""
    s, *columns = np.transpose(rows)
    return np.array([np.interp(np.arange(N) / SR, s, c) for c in columns])


def in_hz(rows):
    """Logarithmic pitch scale: each column of a spectrum at every frequency bin."""
    points, *columns = np.transpose(rows)
    return [np.interp(np.log(BINS + 1), np.log(points), c) for c in columns]


def scene():
    """Superposition: the torch in its two places, with the puff, whistles, passing bands and booms."""
    heard = np.maximum(in_time(BENCH_AUDIBLE), in_time(STOOL_AUDIBLE))
    passing = whistles() + passing_bands() + booms()
    return torch_on_bench() + torch_on_stool() + puff() + heard * passing


def record(dry):
    """Band limiting: an elliptic low-pass cuts the top steeply."""
    cutoff_hz = 15800
    top_cut = signal.ellip(12, .1, 90, cutoff_hz, fs=SR, output="sos")
    return signal.sosfilt(top_cut, dry)


dry = scene()
out = record(dry)
wrap_up_sound(out)
```